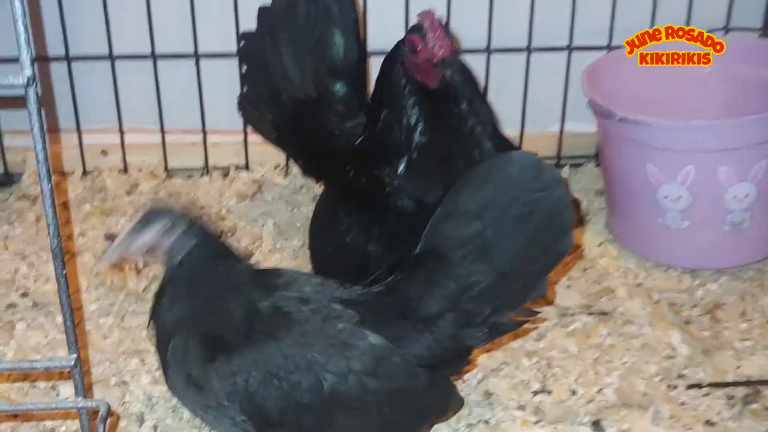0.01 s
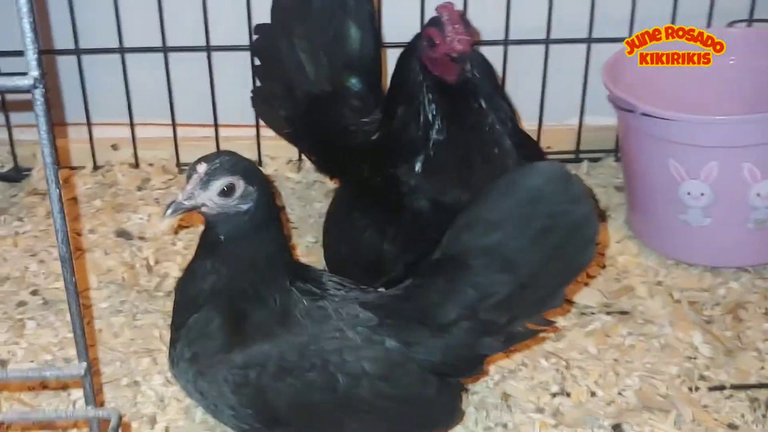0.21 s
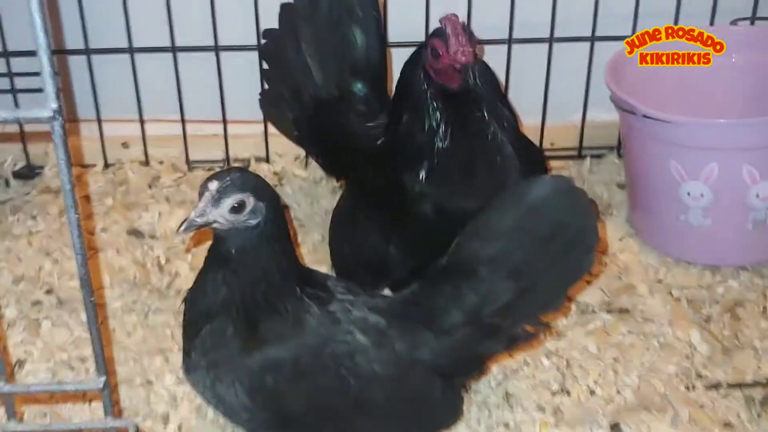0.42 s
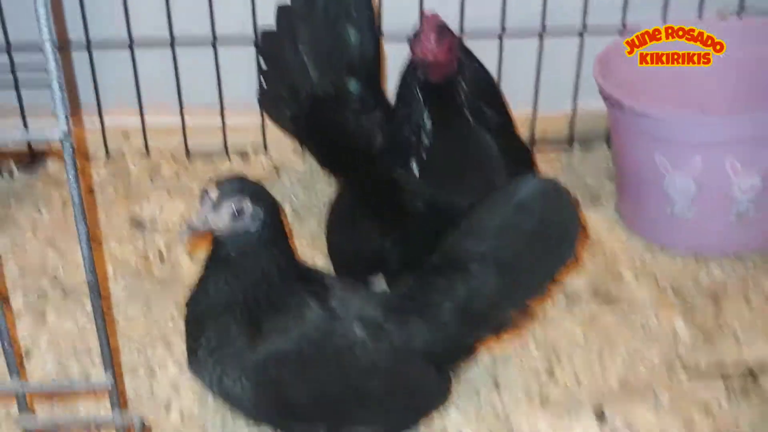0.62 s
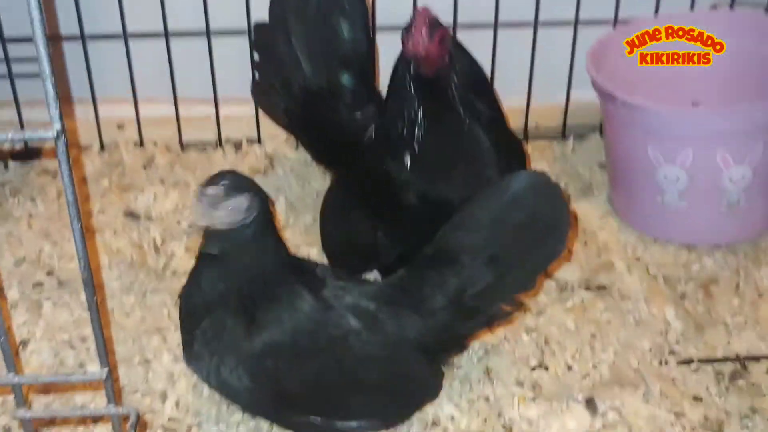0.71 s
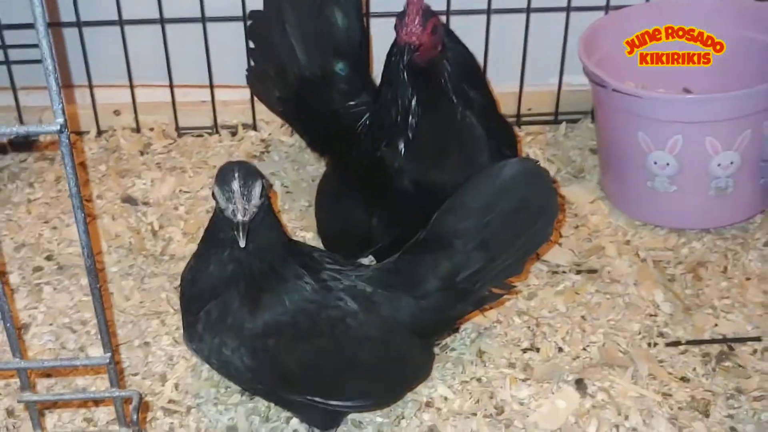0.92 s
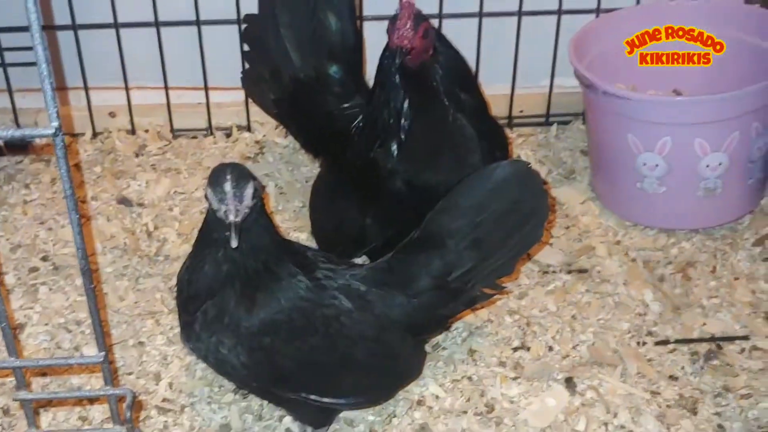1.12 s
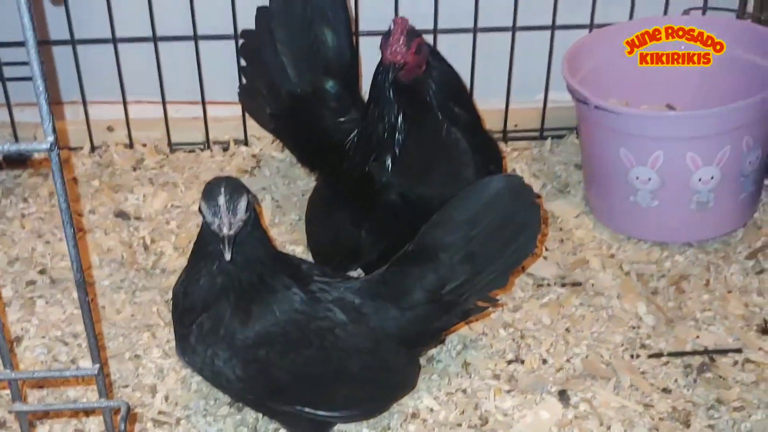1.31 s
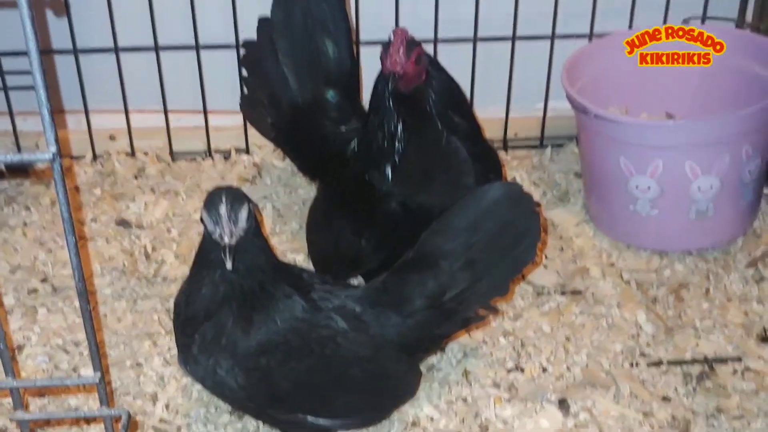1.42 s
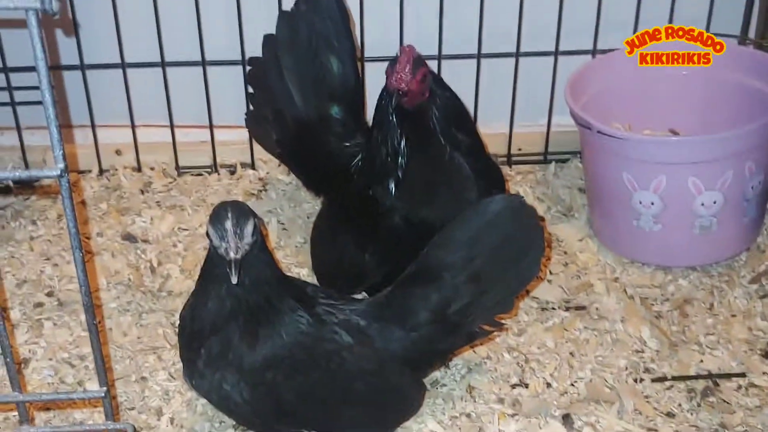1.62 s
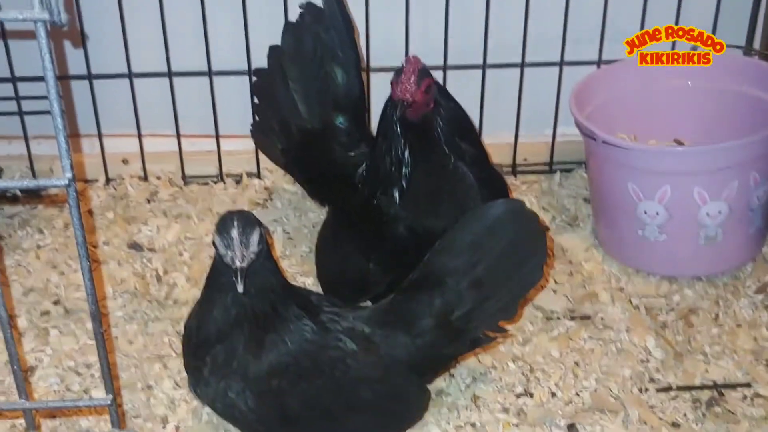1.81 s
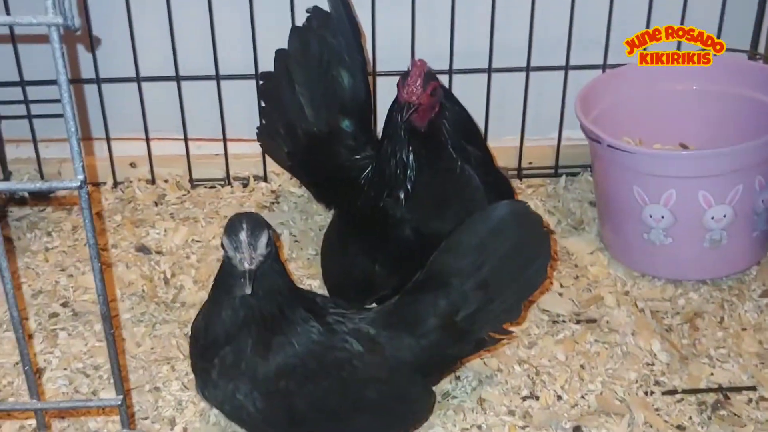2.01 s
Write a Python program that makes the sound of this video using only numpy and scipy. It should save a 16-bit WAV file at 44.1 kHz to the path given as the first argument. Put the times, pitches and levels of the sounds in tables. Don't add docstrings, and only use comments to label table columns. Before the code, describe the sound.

A small hen gives a stuttered, nasal moan that rises and breaks into a hoarse squawk, then a short weaker one; faint peeps and dry shavings rustle, close microphone in a small, slightly echoing shed.

```python
import sys
import numpy as np
from scipy import signal
from scipy.fft import rfft, irfft, next_fast_len
from scipy.io import wavfile
from scipy.ndimage import uniform_filter1d, map_coordinates

SR = 44100
rng = np.random.default_rng(int(sys.argv[2]) if len(sys.argv) > 2 else 0)


def how_loud(loudness_db):
    steps = np.asarray(loudness_db, float) / 20
    return 10 ** steps


def materialize(psi):
    bounded = np.clip(np.atleast_2d(psi).T, -1, 1)
    quanta = np.round(bounded * 32767).astype(np.int16)
    wavfile.write(sys.argv[1], SR, quanta)


N = 92610
T = np.arange(N) / SR

# f/Hz, left over right/dB
BACKGROUND_TILT = [(60, -3.5), (240, 0.5), (950, 2), (3770, -5.5), (15000, -6.5)]
# f/Hz, left lead/rad
BACKGROUND_LEAD = [(60, 0.89), (300, 1.2), (1200, 1.68), (3000, 1.46), (8000, 2.4)]


def unit(x):
    return x / np.sqrt(np.mean(x ** 2) + 1e-20)


def along(points, hz):
    f, v = np.transpose(points)
    return np.interp(np.log(hz + 1), np.log(f + 1), v)


def curves(rows):
    s, *cols = np.transpose(rows)
    return [np.interp(T, s, c) for c in cols]


def wobble(rate):
    coarse = T[::8]
    knots = rng.standard_normal(N // 20)
    return np.interp(T, coarse, map_coordinates(knots, [coarse * rate]))


def phase(hz):
    return 2 * np.pi * np.cumsum(hz) / SR


def filtered(x, response):
    m = next_fast_len(N + SR // 4)
    return irfft(rfft(x, m) * response(np.fft.rfftfreq(m, 1 / SR)), m)[..., :N]


def peak(f, hz, width_hz):
    return 1j * f * width_hz / (hz * hz - f * f + 1j * f * width_hz)


def window(start_s, end_s, rise_s, fall_s):
    edge = np.minimum((T - start_s) / rise_s, (end_s - T) / fall_s)
    return np.sin(np.pi / 2 * np.clip(edge, 0, 1)) ** 2


def ports(x, tilt, lead):
    sign = np.array([[.5], [-.5]])
    return filtered(x, lambda f: how_loud(sign * along(tilt, f)) * np.exp(1j * sign * along(lead, f)))


def hiss(spectrum, alike):
    common, left, right = rng.standard_normal((3, N))

    def share(f):
        return np.clip(alike, 0, 1) / (1 + (f / 4500) ** 4)

    pair = filtered(common, lambda f: np.sqrt(share(f)))
    pair = pair + filtered(np.array([left, right]), lambda f: np.sqrt(1 - share(f)))
    coloured = filtered(pair, lambda f: how_loud(along(spectrum, f)))
    return unit(ports(coloured, BACKGROUND_TILT, BACKGROUND_LEAD))


def background():
    # t/s, hum level/dB
    gate = [(0.0, -52.5), (0.02, -56.5), (0.77, -50), (0.85, -60), (0.87, -61.5), (1.07, -59),
            (1.19, -63.5), (1.51, -64), (1.53, -51.5), (1.62, -61.5), (1.65, -63), (2.1, -66)]
    # f/Hz, level/dB
    mains = [(60, 0), (120, -4), (180, -13.5), (240, -32)]
    # f/Hz, level/dB
    shed = [(12, -89.5), (20, -51.5), (47, -3), (122, -10), (300, -16), (490, -17), (800, -23.5),
            (3300, -32), (15400, -70.5)]
    # f/Hz, level/dB
    preamp = [(7500, -29), (9000, -19.5), (12000, -8.5), (15000, -18)]
    gate_db, = curves(gate)
    hum = sum(how_loud(level + 2.1 * wobble(10.54)) * np.sin(2 * np.pi * hz * T + 0.1 * wobble(4))
              for hz, level in mains)
    floor = 0.57 * how_loud(1.5 + wobble(14)) * hiss(shed, 0.74)
    gated = how_loud(gate_db) * (ports(hum, BACKGROUND_TILT, BACKGROUND_LEAD) + floor)
    return gated + how_loud(-91.5) * hiss(preamp, 0)


def rustle():
    # t/s, level/dB
    moves = [(0.0, -70.5), (0.05, -72.5), (0.1, -70), (0.14, -71), (0.4, -73), (0.44, -62.5), (0.56, -67.5),
             (0.57, -61.5), (0.62, -71), (0.85, -67.5), (0.88, -88), (1.08, -80), (1.15, -88.5),
             (1.52, -80.5), (1.54, -58), (1.64, -58.5), (1.79, -93), (1.95, -99), (2.04, -69), (2.1, -76)]
    # f/Hz, level/dB
    shavings = [(150, -37.5), (2500, -20.5), (4000, -11.5), (5500, -13.5), (7100, -5.5), (8500, -37),
                (11500, -28.5), (15000, -45)]
    # f/Hz, level/dB
    scrape = [(100, -7), (450, -11), (1100, -2.5), (2000, -1.5), (3300, -6), (5000, -22.5), (7500, -52.5),
              (15000, -97)]
    db, = curves(moves)
    clumps_db = 0.5 * wobble(870) + wobble(60)
    scrape_db = db.max() + 1.32 * (db - db.max()) + 13
    crackle = how_loud(db + 6.5) * hiss(shavings, 0.32)
    return how_loud(clumps_db) * (crackle + how_loud(scrape_db) * hiss(scrape, 0.83))


def peeps():
    # t/s, length/s, start f/Hz, end
    # f/Hz, level/dB, second partial/dB
    whistles = [(0.217, 0.009, 1950, 1950, -55, -30), (0.226, 0.022, 1650, 1500, -44, -16),
                (0.245, 0.024, 1830, 1825, -39, -30), (0.268, 0.024, 1800, 1400, -44.5, -30),
                (0.295, 0.015, 1850, 1800, -53, -30), (0.305, 0.015, 1500, 1420, -51, -30),
                (0.338, 0.025, 1600, 1450, -51, -30), (0.372, 0.02, 1520, 1480, -52, -30),
                (0.422, 0.03, 1550, 1420, -54, -30), (1.243, 0.028, 1100, 1260, -47, -14),
                (0.297, 0.016, 220, 160, -52, -6), (1.535, 0.04, 2100, 1900, -54.6, -30),
                (1.605, 0.055, 1150, 1050, -56.5, -30), (1.687, 0.06, 1420, 1380, -62, -2),
                (1.706, 0.09, 1380, 1300, -66, -12), (1.945, 0.03, 2320, 2320, -75, -30),
                (1.968, 0.08, 1390, 1330, -70, 2), (1.963, 0.045, 2150, 2300, -69.5, -30),
                (2.006, 0.05, 2250, 1800, -62.5, -30), (2.028, 0.05, 1800, 1450, -63, -30),
                (2.045, 0.065, 1800, 1550, -65, -30), (0.015, 0.08, 3450, 3350, -71, -60),
                (0.07, 0.1, 7200, 6700, -67, -60), (0.1, 0.11, 6500, 5700, -68, -60)]
    out = np.zeros(N)
    for s, length, hz0, hz1, db, over_db in whistles:
        far = db < -54.5
        hz = np.interp(T, [s, s + length], [hz0, hz1]) * (1 + .015 * wobble(250))
        turn = phase(hz)
        if far:
            flutter = .7 + .65 * wobble(300)
            shape = window(s, s + length, .15 * length, .75 * length) ** 2
        else:
            flutter = how_loud(2.5 * wobble(150))
            shape = window(s, s + length, .45 * length, .55 * length)
        out += how_loud(db + 8.0) * flutter * shape * (np.sin(turn) + how_loud(over_db) * np.sin(2 * turn))
    return out


def membrane(hz, rough, turn, uneven, pull):
    second = np.sin(phase(170.9 * (1 + 0.34 * wobble(35))))
    tones = np.zeros(N)
    for k in range(1, 8):
        shimmer_db = 2.4 * k ** 0.72 * (0.5 - rough / 2) * wobble(70.07)
        fray_db = 2.7 * rough * wobble(180)
        blur = .27 * (k - 1) * rough * wobble(220)
        tones += how_loud(shimmer_db + fray_db) * np.cos(k * turn + pull * rough * second / k + blur)
    half = np.cos(.45 * turn + phase(.06 * hz * wobble(60)))
    return tones + uneven * rough * half * (tones - np.cos(turn))


def other_side():
    # t/s, f/Hz, level/dB
    turns = [(0.745, 336, -33.5), (0.76, 375, 2.5), (0.785, 404.9, 7), (0.815, 398.3, 0.5),
             (0.835, 381.2, -14), (0.885, 390, -4.5), (0.91, 398.2, 2), (0.975, 434.4, -3),
             (1.005, 410.2, -15.5), (1.045, 409, -11), (1.065, 440.2, -2.5), (1.11, 448.5, -8),
             (1.26, 428.3, -24), (1.285, 429.8, -2.5), (1.305, 422, -9.5), (1.335, 449.4, -6),
             (1.39, 406, -5.5)]
    hz, db = curves(turns)
    turn = phase(hz * (1 + 0.0487 * wobble(130)))
    return sum(how_loud(db + level + 2.7 * wobble(39.5)) * np.cos(k * turn) for k, level in [(1, -4), (2, 2)])


def through_throat(source, beak):
    # f/Hz, width/Hz, level/dB
    closed_throat = [(552, 165, 1.5), (1099, 280, 4), (1983, 220, 2), (3040, 130, -19.5), (3080, 300, -24)]
    # f/Hz, width/Hz, level/dB
    open_throat = [(720, 460, -3.5), (1443, 397, 2), (1979, 130, 11.5), (2950, 160, -4.5), (3444, 120, -12)]
    low_hz, high_hz = 334, 2780

    def edge(f):
        band = 1j * f / low_hz / (1 + 1j * f / low_hz) / (1 + 1j * f / high_hz)
        return band ** 2 * (1 - .93 * peak(f, 1627, 282))

    def sung(throat):
        def tube(f):
            return edge(f) * sum((-1) ** k * how_loud(level) * peak(f, hz, width)
                                 for k, (hz, width, level) in enumerate(throat))
        return unit(filtered(source, tube))

    voice = (1 - beak) * sung(closed_throat) + beak * sung(open_throat)
    return voice / np.sqrt(np.abs(uniform_filter1d(voice ** 2, size=1500)) + 1e-9)


def call(rows, fall_s, uneven, pull):
    hz, db, rough, beak = curves(rows)
    rough, beak = np.clip(rough, 0, 1), np.clip(beak, 0, 1)
    unsteady = .014 * wobble(110) + .012 * wobble(45) + 0.0314 * rough * wobble(200)
    turn = phase(hz * (1 + unsteady))
    tones = membrane(hz, rough, turn, uneven, pull) + other_side()
    breath = rng.standard_normal(N) * (1 + np.cos(turn))
    voice = through_throat(tones / 2 + .65 * (0.47 + rough) * breath, beak)
    rasp = how_loud(-36) * (0.8 + rough) * unit(filtered(breath, lambda f: peak(f, 6085, 1100) ** 4))
    shape = window(rows[0][0], rows[-1][0] + fall_s, 0.0081, fall_s * 2)
    pulse_db = 1.8 * (1 - rough / 2) * wobble(89.74)
    return (voice + rasp) * shape * how_loud(db + pulse_db)


def hen():
    # t/s, f/Hz, level/dB, roughness/0-1, beak opening/0-1
    stutter = [(0.224, 540, -28, 0.2, 0), (0.232, 521.6, -33, 0.06, 0.53), (0.268, 519.7, -38, .1, 0),
               (0.278, 529, -38.5, .1, 0), (0.297, 579.5, -41, .25, 0), (0.312, 517, -38, .3, 0),
               (0.33, 571, -39.5, .1, 0), (0.348, 515, -35.5, .1, 0), (0.358, 551, -39, .05, 0.071)]
    moan = [(0.38, 527.4, -40, 0, 0), (0.438, 520.7, -41.5, 0, 0.02), (0.534, 540.6, -39, 0.02, 0.2),
            (0.63, 592, -41.5, 0.1, 0.01), (0.647, 627.4, -39, 0, 0.5), (0.658, 578.5, -43, 0, 0.02),
            (0.712, 633.6, -41.5, 0, 0), (0.73, 601, -41, 0, 0.52), (0.75, 669, -33.5, 0, 0)]
    squawk = [(0.75, 679.5, -33.5, 0.28, 0.14), (0.785, 700.4, -38.5, 1, 0.074),
              (0.835, 678.8, -32.5, 0.49, 0.81), (0.876, 655.5, -33, 0.64, 0.52),
              (0.92, 695, -32.5, 0.98, 0.69), (0.985, 685, -33.5, 0.93, 0.86),
              (1.032, 627, -35.5, 0.24, 0.24), (1.07, 684.8, -33, 1, 0.72),
              (1.122, 634.2, -36.5, 0.84, 0.43)]
    short_squawk = [(1.241, 567, -45, 0.5, .6), (1.256, 591.5, -42.5, .4, .3),
                    (1.272, 575.5, -45, 0.88, 0.34), (1.288, 580.8, -43, 0.45, 0.88),
                    (1.3, 593.2, -45.5, 0.41, 0.19), (1.326, 599, -39, 0.62, 0.68),
                    (1.365, 613, -42.5, 0.67, 0.57), (1.382, 605, -51, 0.36, 0.21),
                    (1.43, 599, -61.5, 0.13, 0.17)]
    # t/s, length/s, depth/dB
    breaks = [
        (0.255, 0.015, 27.5),
        (0.288, 0.009, 11),
        (0.32, 0.0072, 24.5),
        (0.35, 0.0034, 14),
    ]
    shut_db = sum(depth * window(s - length / 2 - .007, s + length / 2 + 0.006, 0.013, 0.0054)
                  for s, length, depth in breaks)
    moaning = call(stutter + moan, 0.0089, uneven=0.44, pull=0.96) * how_loud(-shut_db)
    squawking = call(squawk, 0.037, uneven=0.71, pull=1.11)
    return moaning + squawking + call(short_squawk, 0.074, uneven=1.8, pull=0.5)


def room(x):
    t = T[:SR // 3]
    tail = rng.standard_normal((2, len(t))) * how_loud(-60 * t / .17)
    late = np.pad(x, (300, 0))[None]
    return signal.fftconvolve(late, tail / np.linalg.norm(tail[0]), axes=1)[:, :N]


def scene():
    # f/Hz, left over right/dB
    bird_tilt = [(60, -15), (180, 1), (550, 1.5), (1650, -2), (4970, -6.5), (15000, -1)]
    # f/Hz, left lead/rad
    bird_lead = [(300, 0.68), (700, 0.51), (1400, 1.39), (2200, 1.2), (4000, 1.85)]
    birds = hen() + peeps()
    direct = ports(birds, bird_tilt, bird_lead)
    return background() + rustle() + how_loud(-12) * room(birds) + direct


def top_cut(x):
    return signal.sosfilt(signal.butter(12, 15600, fs=SR, output="sos"), x)


def record(dry):
    mix = filtered(dry, lambda f: f < 15650)
    return top_cut(mix)


dry = scene()
out = record(dry)
materialize(out)
```